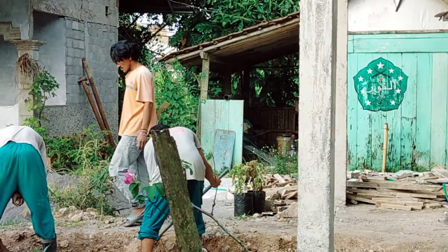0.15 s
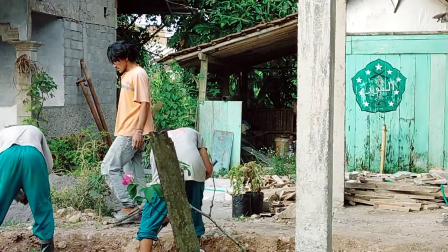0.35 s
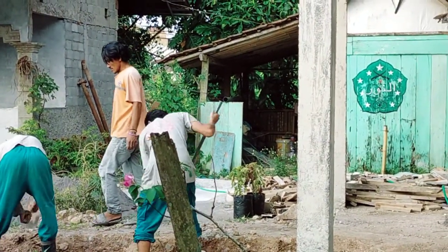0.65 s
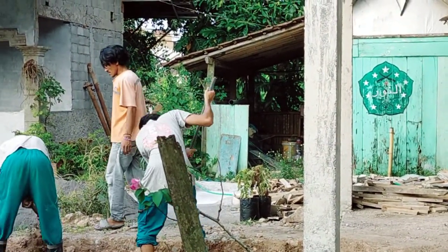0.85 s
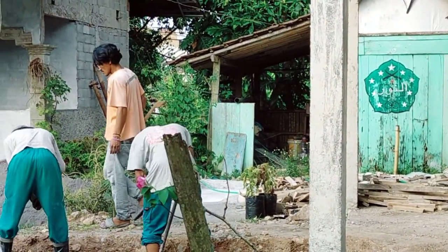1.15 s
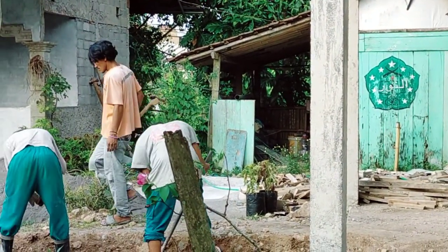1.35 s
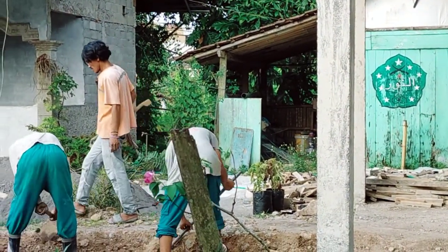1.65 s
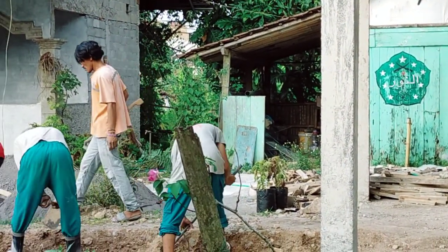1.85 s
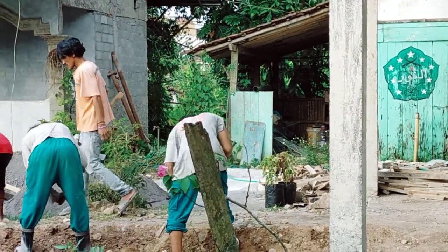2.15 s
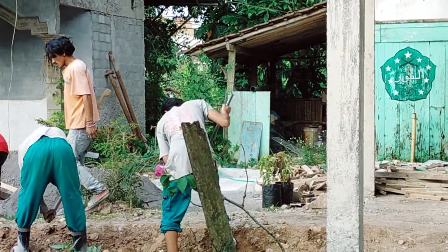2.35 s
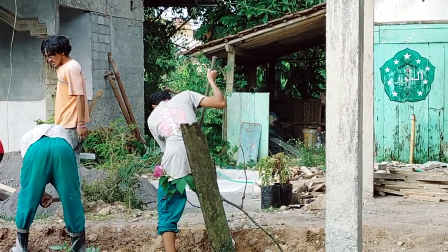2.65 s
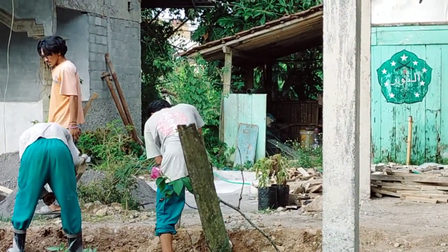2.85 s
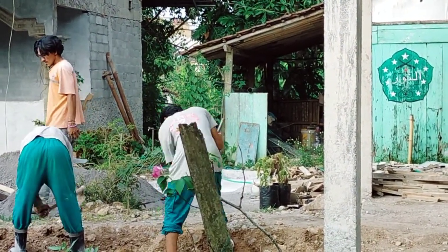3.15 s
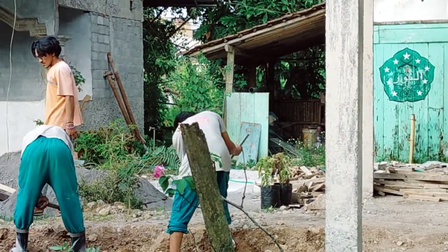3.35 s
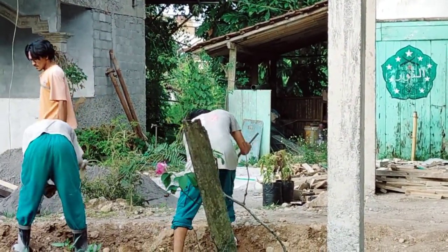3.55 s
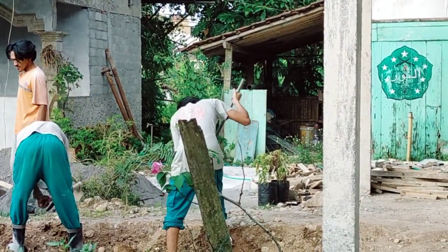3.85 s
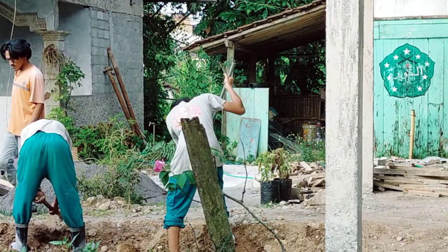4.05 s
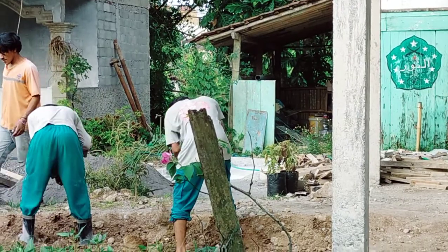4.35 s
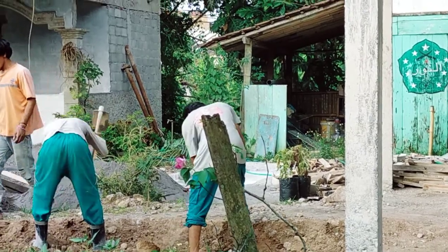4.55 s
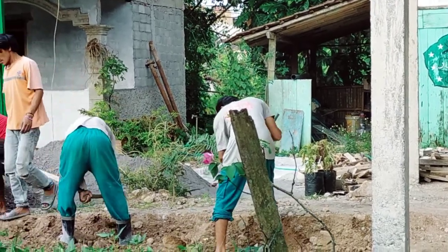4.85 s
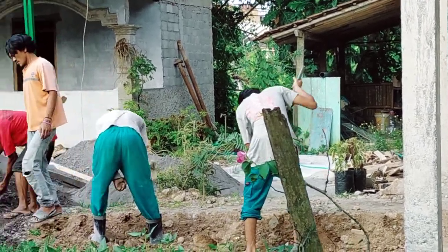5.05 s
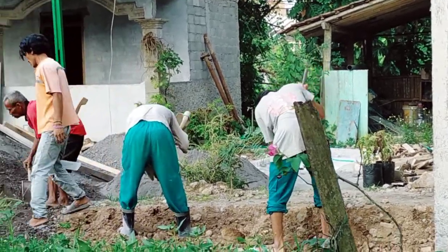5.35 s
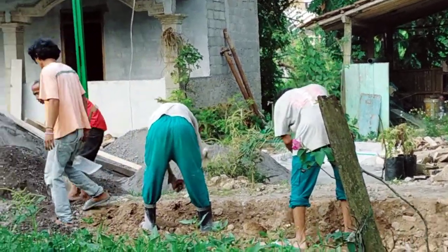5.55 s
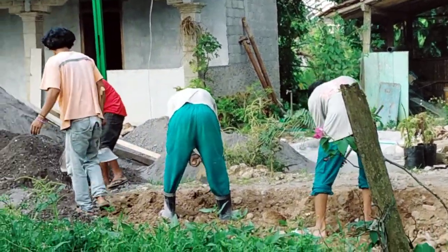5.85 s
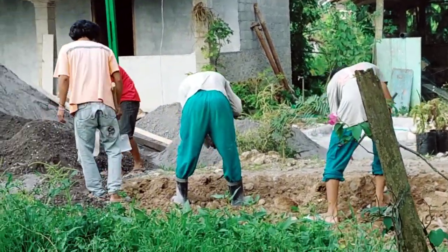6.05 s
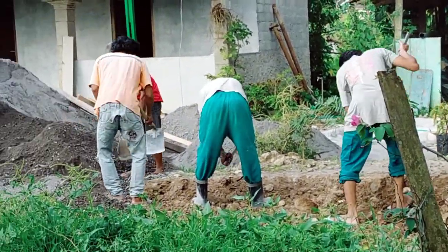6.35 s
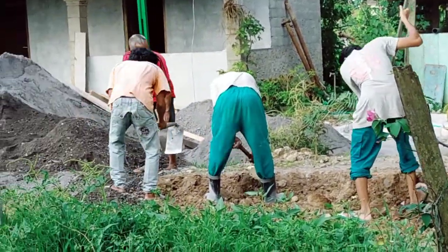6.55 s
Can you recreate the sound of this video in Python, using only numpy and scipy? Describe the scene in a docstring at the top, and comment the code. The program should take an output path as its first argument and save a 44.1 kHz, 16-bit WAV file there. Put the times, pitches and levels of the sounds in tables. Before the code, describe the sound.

Hoes chop into stony soil and a shovel scrapes through gravel while small birds chirp in the background.

```python
"""Digging at a building site

Hand hoes chop into stony soil with a crunch, a clack and a thud; loose stones knock on steel and a
shovel scrapes through sand and gravel. Farther off, small birds whistle falling notes and nearby walls
answer. Under it lies a bed of breeze, far traffic, leaves and insects buzzing in the trees."""
import sys
import numpy as np
from scipy import signal
from scipy.fft import rfft, irfft, next_fast_len
from scipy.io import wavfile
from scipy.ndimage import map_coordinates

SR = 44100
rng = np.random.default_rng(int(sys.argv[2]) if len(sys.argv) > 2 else 0)


def waveform_to_disk(signal):
    """Save audio, clipped to [-1, 1], as 16-bit WAV at the path in sys.argv[1]."""
    frames = np.transpose(np.atleast_2d(signal))
    scaled = np.clip(frames, -1, 1) * 32767
    samples = np.round(scaled).astype(np.int16)
    wavfile.write(sys.argv[1], SR, samples)


N = 295029

# Hoe hits, each with trims for its layers: (time [s], level [dB], thud trim [dB], thud pitch [Hz],
# clack trim [dB], clack pitch [Hz], grit trim [dB], bite length [s], spray trim [dB])
HOE_HITS = [(0.845, -18.5, -2, 305, -2, 2890, 3.5, 0.0081, -8.5),
            (1.204, -35.5, 4, 206, 1.5, 2850, 2, 0.011, -11),
            (1.737, -19.5, -1, 165, -0.5, 1350, 4, 0.0071, -11.5),
            (2.587, -15.5, -3, 190, -2.5, 1930, 0.5, 0.0034, -37),
            (3.373, -22.5, -2, 159, 3.5, 1120, -2.5, 0.003, -10),
            (4.061, -19, -17, 245, 2, 2160, -2, 0.0028, -11),
            (4.75, -30, -12, 200, -3, 2840, -13, 0.0058, -31),
            (4.926, -15.5, -5.5, 180, -3.5, 1530, -6.5, 0.0027, -37),
            (5.746, -16, -7, 303, -4, 1280, -4, 0.0079, -18),
            (6.578, -25.5, -3.5, 387, -2.5, 2330, -1.5, 0.0065, -20)]


def hoes(spray_t60_s=0.19, attack_s=0.002, lead_s=0.015, upper_thud_hz=450):
    """The edge crushes grit and strikes a stone, the ground thuds at two low pitches, then loose soil sprays."""
    out, t = np.zeros(N), np.arange(SR // 3) / SR - lead_s
    for s, db, thud_db, thud_hz, clack_db, clack_hz, grit_db, bite_s, spray_db in HOE_HITS:
        bite = np.exp(np.where(t < 0, t / attack_s, -(t / bite_s) ** 2))
        crush = crunching(bite, rate=20000, spread_db=8.5)
        clumps = (t > 0) * amp(5 * wobble(182, len(t)))
        spray = crunching(clumps * amp(spray_db - 60 * t / spray_t60_s), rate=3200, spread_db=8)
        clack = amp(clack_db - 6.5) * np.linalg.norm(crush) * knock(clack_hz, t60_s=0.012)
        thud = amp(thud_db + 5) * (knock(thud_hz, t60_s=0.042) + amp(-6.5) * knock(upper_thud_hz, t60_s=0.046))
        cut = soil_contact(crush, thud_db, clack_db, grit_db + 2.5, ring_db=-16)
        settle = soil_contact(spray, thud_db - 3, clack_db, grit_db - 7.5, ring_db=-16.5)  # soft, duller
        add(out, s - lead_s, amp(db) * (cut + settle))
        add(out, s, amp(db) * (clack + thud))
    return out


# Stone hits on a blade: (time [s], level [dB], grit trim [dB], clack pitch [Hz], thud trim [dB])
STONE_HITS = [(0.885, -28, -17, 2710, -8), (1.776, -23.5, 7, 2360, -0.5), (1.995, -45, 0, 2815, 6),
              (2.243, -34, -9, 1330, 7), (2.267, -31.5, -14, 2890, 12.5), (2.344, -31, -3, 2500, -8),
              (2.377, -31.5, -10, 2800, -4), (2.959, -34, -5, 2260, 11), (3.675, -39.5, -3, 1380, 6),
              (3.709, -31.5, -2, 2640, -10), (3.717, -32.5, -23, 2560, -14), (3.735, -37.5, -38, 2880, -10),
              (3.784, -33, -9, 3000, -8), (4.069, -24, 4, 2100, -8), (4.230, -28, -5, 2430, -14),
              (4.338, -37.5, -6, 1210, 14), (5.04, -26, 0.5, 2480, -12), (5.529, -32, -9.5, 2330, -5),
              (5.550, -36.5, 0, 2104, -3), (6.082, -47.5, -14, 1380, 5), (6.526, -46, -9, 2400, -3)]


def stones(chatter_t60_s=0.0254, thud_hz=190):
    """Stones chatter against the steel and thud in the soil; the less grit, the stronger the clack."""
    out, t = np.zeros(N), np.arange(SR // 6) / SR
    for s, db, grit_db, clack_hz, thud_db in STONE_HITS:
        chatter = crunching(amp(-60 * t / chatter_t60_s), rate=9000, spread_db=6.5)
        clack = amp(-6 - 0.48 * grit_db) * np.linalg.norm(chatter) * knock(clack_hz, t60_s=0.0207)
        thud = amp(thud_db + 3.5) * knock(thud_hz, t60_s=0.058)
        rattle = soil_contact(chatter, thud_db=1.5, clack_db=0, grit_db=grit_db, ring_db=-7.5)
        add(out, s - 0.001, amp(db) * rattle)
        add(out, s, amp(db) * (clack + thud))
    return out


# Tone of stony soil: (frequency [Hz], relative level [dB])
SOIL_EQ = [(60, -30), (160, -13.5), (280, 0.5), (360, -21), (450, -3), (640, -13), (1050, -2), (2000, 4.5),
           (3050, 7.5), (3900, -9.5), (5500, -7), (9300, -14), (12000, -2.5), (16000, -15)]


def soil_contact(force, thud_db, clack_db, grit_db, ring_db):
    """A force on stony soil: low thud, mid clack and gritty top, with the blade ringing along."""
    trims = [(400, thud_db), (900, clack_db), (1900, clack_db),
             (2800, 0), (5000, grit_db / 2), (11000, grit_db)]
    ground = impulse_response([(hz, db + along(trims, hz)) for hz, db in SOIL_EQ])
    return through(force, ground) + amp(ring_db) * through(force, blade_ring())


# Modes of the steel blade: (frequency [Hz], base bandwidth [Hz], relative level [dB])
BLADE_MODES = [(1039, 17, -5.5), (1323.6, 38, 4), (1820, 67, -25), (2190, 4.7, -16.5), (2800, 36, 3),
               (5480, 290, -3), (6300, 60, -34), (11060, 130, -10), (11550, 98, -26)]


def blade_ring(sustain=2.2):
    """Ringing steel, energy 1; soil loads the modes differently at each contact."""
    ring, t = np.zeros(SR // 4), np.arange(SR // 4) / SR
    for hz, width_hz, db in BLADE_MODES:
        gain = amp(db + rng.normal(0, 0.39)) * np.sqrt(width_hz)
        decay = np.exp(-np.pi * width_hz * t / sustain)
        ring += gain * decay * np.sin(2 * np.pi * hz * rng.normal(1, 0.0032) * t)
    return ring / np.linalg.norm(ring)


# Shovel pushes: (start [s], attack [s], length [s], crunch send [dB], hiss send [dB])
SHOVEL_PUSHES = [(-0.02, 0.0131, 0.049, -39, -42.5), (0.096, 0.064, 0.23, -51.5, -51),
                 (0.32, 0.0246, 0.16, -82, -56), (1.949, 0.036, 0.12, -55, -56.5),
                 (2.185, 0.12, 0.086, -39, -44.5), (2.308, 0.097, 0.15, -40, -41),
                 (2.46, 0.03, 0.06, -40.5, -45.5), (2.677, 0.024, 0.13, -53, -55.5),
                 (3.685, 0.022, 0.022, -42.5, -36), (3.759, 0.032, 0.051, -45, -39.5),
                 (3.815, 0.06, 0.091, -44, -46), (3.95, 0.029, 0.051, -42, -47.5),
                 (4.082, 0.021, 0.13, -51, -48), (4.317, 0.019, 0.11, -54.5, -59.5),
                 (4.74, 0.0093, 0.058, -44, -44.5), (4.814, 0.033, 0.081, -53, -51.5),
                 (4.963, 0.02, 0.096, -48.5, -48), (5.252, 0.12, 0.13, -42.5, -45)]
# Body of the gravel crunch: (frequency [Hz], relative level [dB])
GRAVEL_EQ = [(90, -41), (200, -19.5), (480, -1.5), (680, -13), (1250, 2), (1800, -3.5), (2700, 7),
             (3250, -0.5), (3900, -14.5), (5600, -9), (6700, -32), (7800, -8), (9000, -48), (16000, -63)]
# Sizzle of sand on steel: (frequency [Hz], relative level [dB])
SAND_EQ = [(3000, -38), (6000, -3), (9000, -11), (11000, -4), (12500, 2.5), (14200, 2.5), (16000, -19)]


def shovel(sag_db_per_s=5, settle_t60_s=0.26):
    """The blade slips jerkily through the heap: gravel crunches, pebbles click, sand hisses on steel."""
    t, crunch, hiss = np.arange(N) / SR, np.zeros(N), np.zeros(N)
    for s, attack_s, length_s, crunch_db, hiss_db in SHOVEL_PUSHES:
        age = np.maximum(t - s, 0)
        # the blade slows, then the gravel settles
        fade_db = sag_db_per_s * age + 60 * np.maximum(age - length_s, 0) / settle_t60_s
        push = np.minimum(age / attack_s, 1) * amp(-fade_db)
        crunch = np.maximum(crunch, push * amp(crunch_db))
        hiss = np.maximum(hiss, push * amp(hiss_db))
    slips = unit(amp(2 * wobble(45, N) + 2.5 * wobble(170, N)))
    gravel_force = crunch * slips * grains(rate=2800, spread_db=2.3, size=N)
    sand_force = hiss * slips * grains(rate=4500, spread_db=6.5, size=N)
    gravel = amp(3.5) * through(gravel_force, impulse_response(GRAVEL_EQ))
    steel = amp(-29) * through(gravel_force, blade_ring())
    pebbles = amp(-5) * crunch * pebble_clicks()
    sand = amp(-0.5) * through(sand_force, impulse_response(SAND_EQ))
    return gravel + steel + pebbles + sand


def pebble_clicks(per_s=100, centre_hz=2400, spread=0.336, range_db=16):
    """Pebbles click against each other, each at its own pitch; rms 1."""
    out = np.zeros(N)
    for when, pitch, strength in rng.random((int(per_s * N / SR), 3)):
        hz = centre_hz * np.exp(spread * (2 * pitch - 1))
        add(out, when * N / SR, amp(range_db * strength) * knock(hz, t60_s=0.016))
    return unit(out)


# Falling bird calls: (start [s], length [s], top pitch [Hz], end pitch [Hz], level [dB])
FALLING_CALLS = [(0.276, 0.14, 4300, 2640, -41), (0.658, 0.12, 3560, 2235, -39),
                 (1.0, 0.11, 3083, 2565, -50.5), (1.26, 0.1, 2976, 2503, -47),
                 (1.533, 0.17, 4420, 2505, -45), (1.861, 0.22, 4400, 2680, -45.5),
                 (2.433, 0.1, 3060, 2190, -39), (2.841, 0.25, 4476, 2820, -51),
                 (3.185, 0.17, 3640, 2180, -38), (3.527, 0.18, 3490, 2028, -33),
                 (3.953, 0.12, 3120, 2440, -38.5), (4.27, 0.23, 4290, 2570, -48.5),
                 (4.475, 0.17, 3076, 2243, -44.5), (5.126, 0.17, 3869, 2440, -43),
                 (5.869, 0.11, 3070, 2530, -40.5), (6.151, 0.15, 4484, 2410, -46),
                 (6.41, 0.17, 3257, 2198, -38)]
# Held bird whistles: (start [s], length [s], pitch [Hz], droop [Hz], level [dB])
HELD_WHISTLES = [(0.26, 0.067, 4540, 240, -61), (1.046, 0.11, 6250, 56, -66), (1.167, 0.08, 4350, 250, -58),
                 (1.38, 0.15, 6270, 620, -71), (1.506, 0.097, 4440, 105, -58), (1.898, 0.15, 5400, 30, -68),
                 (2.051, 0.15, 2582, 590, -43), (2.123, 0.13, 4550, 320, -61), (2.81, 0.11, 4390, 400, -55),
                 (2.912, 0.17, 3137, 1410, -43.5), (2.957, 0.098, 5450, 510, -63),
                 (3.069, 0.14, 4420, 560, -70), (3.237, 0.21, 4240, 950, -55.5),
                 (3.244, 0.22, 4690, 700, -66), (3.5, 0.14, 4330, 124, -62), (4.638, 0.107, 4550, 80, -55),
                 (5.571, 0.14, 2607, 740, -44.5), (5.966, 0.042, 5230, 36, -61),
                 (6.136, 0.05, 4500, 290, -62.5), (6.227, 0.093, 5480, 15, -67),
                 (6.44, 0.17, 5400, 980, -73)]


def birds(bend=0.8, sung_share=0.78, growth_db_per_octave=23.5, far_calls_per_s=3):
    """Calls hold their top, then slide down and grow; whistles only droop; the flock answers faintly."""
    out = np.zeros(N)
    for s, length_s, top_hz, end_hz, db in FALLING_CALLS:
        progress = np.linspace(0, 1, int(length_s * SR))
        slide = np.sin(np.pi / 2 * sung_share * progress ** bend) ** 2  # an S-curve that breaks off
        glide = top_hz * (end_hz / top_hz) ** (slide / slide[-1])
        add(out, s, bird_note(glide, db - growth_db_per_octave * np.log2(glide / end_hz)))
    flock = [(when * N / SR, 0.063, 5280 * np.exp(0.17 * (pitch - 0.5)), 658, -69)
             for when, pitch in rng.random((int(far_calls_per_s * N / SR), 2))]
    for s, length_s, pitch_hz, droop_hz, db in HELD_WHISTLES + flock:
        progress = np.linspace(0, 1, int(length_s * SR))
        add(out, s, bird_note(pitch_hz - droop_hz * progress ** 2, db))
    return out


def bird_note(glide_hz, db, rasp=0.021, wander=0.006, flutter_db=3):
    """One gliding tone with uneven bends and a fast, hoarse tremble; it roughens as it falls."""
    size, lowness = len(glide_hz), 3000 / glide_hz
    tremble = rasp * lowness ** 2.5 * wobble(411, size)
    bends = wander * lowness * wobble(35.5, size)
    hz = glide_hz * (1 + tremble + bends)
    swell = np.abs(np.sin(np.linspace(0, np.pi, size))) ** 0.47
    gain = amp(db - 1 + flutter_db * wobble(127, size))
    return swell * gain * np.sin(2 * np.pi * np.cumsum(hz) / SR)


def mic_bump(at_s=0.034, start_hz=400, sag_s=0.004, t60_s=0.0123, db=-14):
    """A soft knock on the microphone: one low swing that slows as it dies."""
    out, t = np.zeros(N), np.arange(SR // 20) / SR
    turns = np.cumsum(start_hz / (1 + t / sag_s)) / SR
    add(out, at_s, -amp(db - 60 * t / t60_s) * np.sin(2 * np.pi * turns))
    return filtered(out, lambda hz: 1 / (1 + (hz / 850) ** 6))


# Reverb decay of the site, before t60_scale: (frequency [Hz], base t60 [s])
WALL_DECAY = [(150, 0.079), (1000, 0.39), (2800, 0.36), (6000, 0.38), (14000, 0.14)]


def wall_reverb(x, t60_scale, build_s):
    """Scattered answer of walls and trees, each frequency dying at its own speed."""
    hz, t, noise = signal.stft(rng.standard_normal(SR * 2 // 3), SR, nperseg=256)
    t60_s = t60_scale * along(WALL_DECAY, hz)[:, None]
    tail = signal.istft(noise * amp(-60 * t / t60_s), SR, nperseg=256)[1]
    tail *= 1 - np.exp(-np.arange(len(tail)) / SR / build_s)
    return through(x, tail / np.linalg.norm(tail))


# Low end of breeze and far traffic: (frequency [Hz], relative level [dB])
RUMBLE_EQ = [(20, -1.5), (65, 5), (120, -8), (220, -27), (600, -40)]
# Level of that rumble, swelling with a puff of wind: (time [s], level [dB])
RUMBLE_SWELL = [(0, -56), (2.6, -56.5), (3.0, -49.5), (3.9, -55), (5.0, -56), (6.69, -55)]
# Tone of air in the leaves: (frequency [Hz], relative level [dB])
LEAVES_EQ = [(20, -25), (150, -3), (300, -19), (700, -21), (1300, -21.5), (2000, -21.5), (2800, -16.5),
             (3300, -22.5), (4000, -34), (5300, -30.5), (6500, -42), (12000, -37.5), (16000, -37.5)]


def breeze():
    """Wind and far traffic rumble under a nearly steady rustle of leaves."""
    gust = amp(np.interp(np.arange(N) / SR, *np.transpose(RUMBLE_SWELL)))
    rumble = unit(filtered(rng.standard_normal(N), lambda hz: amp(along(RUMBLE_EQ, hz))))
    leaves = unit(through(rng.standard_normal(N), impulse_response(LEAVES_EQ)))
    return gust * rumble + amp(-56 + 0.2 * wobble(5, N)) * leaves


# Swells of the insect buzz: (peak time [s], level [dB])
INSECT_SWELLS = [(0.36, -63), (1.5, -63.5), (2.55, -65), (3.55, -63), (4.62, -61.5), (5.88, -60.5),
                 (6.85, -63.5)]


def insects(rest_db=-69.5, rise_s=0.41, fall_s=0.12):
    """Two shrill bands of insect buzz; the lower one swells about once a second."""
    t = np.arange(N) / SR
    swells = sum(amp(db) * np.exp(-((t - s) / np.where(t < s, rise_s, fall_s)) ** 2)
                 for s, db in INSECT_SWELLS)
    gain = np.hypot(amp(rest_db), swells) * amp(0.66 * wobble(55, N))
    return gain * noise_band(7530, 264) + amp(-66.5) * noise_band(9990, 620)


def knock(hz, t60_s):
    """One quickly damped resonance, energy 1."""
    t = np.arange(SR // 8) / SR
    ring = amp(-60 * t / t60_s) * np.sin(2 * np.pi * hz * t)
    return ring / np.linalg.norm(ring)


def grains(rate, spread_db, size):
    """Tiny random collisions of uneven strength, about rate a second; rms 1."""
    hits = (rng.random(size) < rate / SR) * rng.choice([-1, 1], size)
    return unit(hits * amp(spread_db * np.clip(rng.standard_normal(size), -2, 2)))


def crunching(envelope, rate, spread_db):
    """Grains under an envelope, carrying the envelope's energy."""
    force = envelope * grains(rate, spread_db, len(envelope))
    return force * np.linalg.norm(envelope) / np.linalg.norm(force)


def noise_band(centre_hz, width_hz):
    """Narrow noise of rms 1."""
    return unit(filtered(rng.standard_normal(N), lambda hz: 1 / (1 + ((hz - centre_hz) / width_hz) ** 2)))


def wobble(rate, size):
    """A smooth random curve, rate knots a second."""
    knots = rng.standard_normal(int(size * rate / SR) + 4)
    return map_coordinates(knots, [np.arange(size) * rate / SR])


def impulse_response(eq, size=2048):
    """Minimum-phase impulse response of an EQ curve, energy 1."""
    cepstrum = irfft(np.log(amp(along(eq, np.fft.rfftfreq(size, 1 / SR)))))
    cepstrum[1:size // 2] *= 2
    cepstrum[size // 2 + 1:] = 0
    impulse = irfft(np.exp(rfft(cepstrum)))
    return impulse / np.linalg.norm(impulse)


def through(x, impulse):
    """x passed through an impulse response."""
    return signal.fftconvolve(x, impulse)[:len(x)]


def filtered(x, response):
    """x shaped by a gain at each frequency."""
    size = next_fast_len(len(x) + SR // 4)
    return irfft(rfft(x, size) * response(np.fft.rfftfreq(size, 1 / SR)), size)[:len(x)]


def along(points, hz):
    """A curve of (frequency [Hz], value) points read on a log axis."""
    knots_hz, values = np.transpose(points)
    return np.interp(np.log(hz + 1), np.log(knots_hz), values)


def amp(db):
    """Decibels to gain."""
    return 10 ** (np.asarray(db) / 20)


def unit(x):
    """x at rms 1."""
    return x / np.sqrt(np.mean(x ** 2) + 1e-20)


def add(track, s, sound):
    """Mix a sound into the track at time s."""
    part = track[max(round(s * SR), 0):][:len(sound)]
    part += sound[:len(part)]


def scene():
    """Tools up front, birds set back and smeared by the nearest walls, ambience underneath."""
    hits, scrapes, song = hoes() + stones(), shovel(), birds()
    tool_send = hits + amp(-3.5) * scrapes
    digging = hits + scrapes + amp(-4.5) * wall_reverb(tool_send, t60_scale=1.19, build_s=0.0031)
    song_smear = amp(-3) * wall_reverb(song, t60_scale=0.13, build_s=0.002)
    song_tail = amp(-4) * wall_reverb(song, t60_scale=0.9, build_s=0.02)
    distant_birds = amp(-0.5) * (song + song_smear + song_tail)
    return (digging + distant_birds + breeze() + insects() + mic_bump())[None]


def record(dry, top_hz=15850):
    """A brick-wall high cut on the mono mix."""
    return filtered(dry[0], lambda hz: hz < top_hz)[None]


dry = scene()
out = record(dry)
waveform_to_disk(out)
```